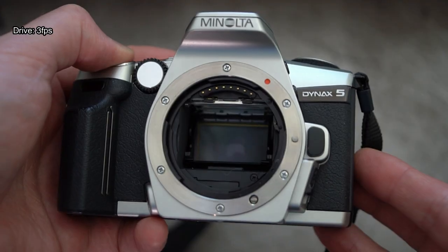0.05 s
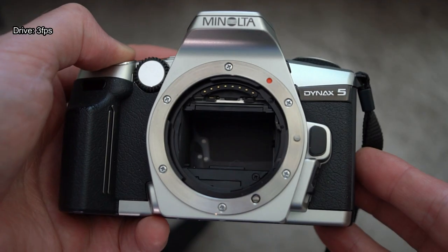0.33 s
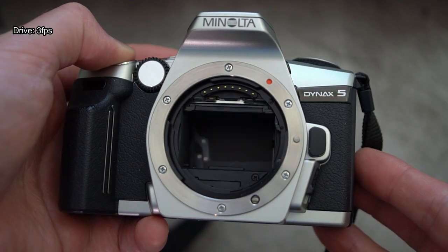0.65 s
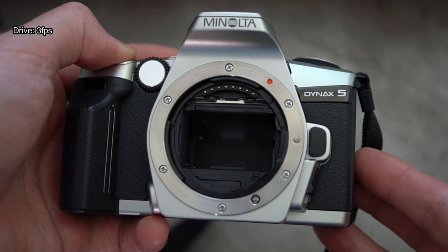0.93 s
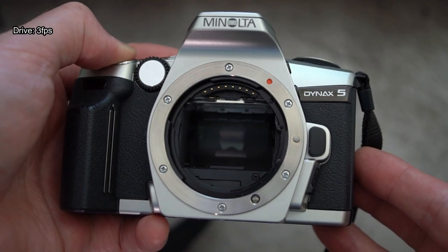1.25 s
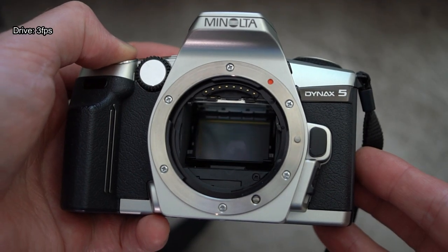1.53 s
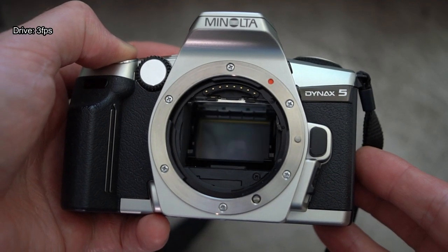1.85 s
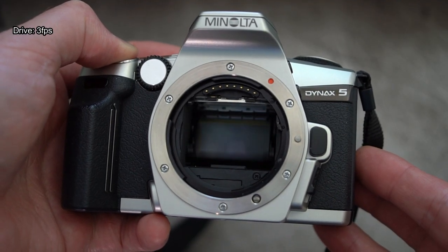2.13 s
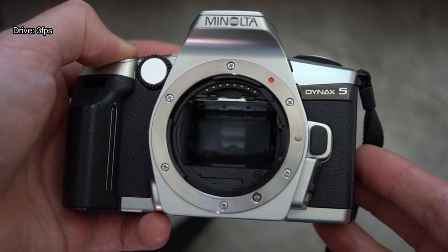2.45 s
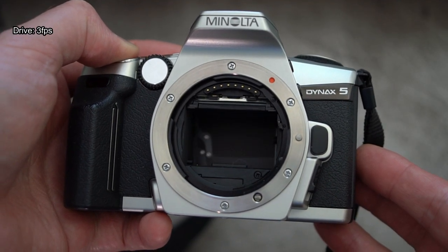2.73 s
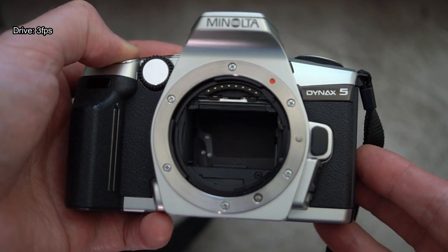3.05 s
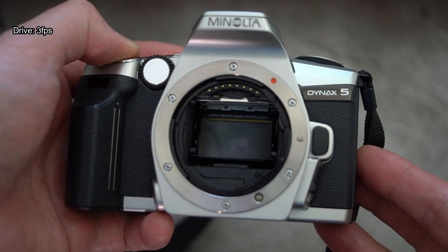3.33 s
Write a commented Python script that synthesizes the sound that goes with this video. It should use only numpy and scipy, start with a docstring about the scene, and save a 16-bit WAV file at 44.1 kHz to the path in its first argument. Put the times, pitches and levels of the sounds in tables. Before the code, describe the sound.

A film camera's shutter fires nine times, close by in a small quiet room. From about 0.2 seconds, shots repeat evenly three times a second, each a crisp mirror click and shutter snap followed by a short gear whine and ratcheting clatter, with faint spring ringing. A soft knock precedes the last shot at 2.9 seconds, and the mechanism locks with a final click at 3.3 seconds.

```python
"""A film camera without a lens fires nine frames, three a second, close by in a small quiet room.
The motor takes up the slack; then in each frame the mirror is released and rises, the shutter snaps,
the winder's gears whine, and the mirror drops back with a clatter of ratchet, cam and pawl.
A soft knock precedes the last frame, and after that frame the mechanism locks. Each impact excites
the resonances of the part it strikes, and the springs and the room ring on briefly."""
import sys
import numpy as np
from scipy import signal
from scipy.fft import rfft, irfft
from scipy.io import wavfile
from scipy.ndimage import uniform_filter1d

SR = 44100
rng = np.random.default_rng(int(sys.argv[2]) if len(sys.argv) > 2 else 0)


def int16_out(signal):
    """Quantize to a 16-bit WAV file."""
    q = np.round(np.clip(np.atleast_2d(signal).T, -1, 1) * 32767)
    wavfile.write(sys.argv[1], SR, q.astype(np.int16))


N = 158760

# mirror release, shutter and mirror return in each frame: start_s
RELEASE_S = [0.2271, .5380, 0.8807, 1.2191, 1.5615, 1.9002, 2.2440, 2.585, 2.9306]
SHUTTER_S = [0.301, 0.6214, 0.959, 1.3007, 1.6389, 1.9819, 2.3216, 2.6671, 3.0139]
RETURN_S = [0.4203, 0.7624, 1.1015, 1.4429, 1.782, 2.1251, 2.4651, 2.8113, 3.1581]
# resonance spectra of the parts that the movements strike: frequency_hz, level_db
CATCH = [(300, -37), (1080, -13), (1330, -10.5), (1550, -5), (3400, -8.5), (4200, -1), (6600, 3), (7200, 0),
         (8000, 1), (11000, -10.5), (14000, 7), (15500, -16.5)]
LEVER = [(300, -41), (950, -16.5), (3680, -5), (7010, -2.5), (7500, -1), (11230, -0.5), (15500, -2.5)]
STOP = [(300, -37), (800, -16.5), (2410, -8), (3770, -12.5), (5890, 3.5), (7740, -0.5), (10420, 0),
        (15500, -8)]
BLADES = [(300, -33.5), (940, -11), (2660, -14.5), (3010, -1), (3330, -16), (6190, 3), (7200, -7),
          (7930, 4), (8550, -5.5), (15500, -7.5)]
LATCH = [(300, -51.5), (1100, -11.5), (2240, -6), (3500, -17.5), (4830, -6), (5350, 2), (7010, -11),
         (8340, 0), (9440, -5), (9920, -1.5), (10680, -10.5), (15500, -8)]
MIRROR = [(300, -34.5), (950, -17), (1150, -0.5), (1330, -7), (1600, -2), (4600, -1.5), (5750, 3.5),
          (7400, -5.5), (13000, -1), (15500, -7)]
TOOTH = [(300, -33.5), (950, -8), (1170, 0), (1400, -7.5), (4200, -5), (5750, 8), (8700, -7), (10170, 7.5),
         (11400, -3.5), (12700, 8), (15500, -7.5)]
TICK = [(300, -48), (5080, -19.5), (7550, -8.5), (9210, -16), (10100, 1.5), (11510, -15), (13690, -4.5),
        (15500, -24.5)]
PAWL = [(300, -47.5), (1060, -13.5), (1700, -4), (2750, 0.5), (3200, -9.5), (3700, -2), (7010, -8.5),
        (8000, -0.5), (10680, -4.5), (12710, 1), (15500, -11)]
HOLLOW = [(700, -41), (1850, -17.5), (2200, -1), (2370, 0.5), (2650, -10.5), (5000, -43)]
BODY = [(150, -30.5), (420, -33.5), (660, -8.5), (980, -1.5), (1200, -4.5), (1900, -8.5), (8000, -21)]
LEAD_S, ATTACK_MS = .008, .25  # time allowed for the scrape before a contact; rise of the contact
WIDTH = .33  # ratio of side to mid amplitude


def amp(db):
    """Amplitude ratio of a level in decibels."""
    return 10 ** (np.asarray(db) / 20)


def unit(x):
    """Normalisation to an energy of 1."""
    return x / np.sqrt(np.sum(x ** 2))


def stereo(mid, side):
    """Sum and difference of mid and side give left and right."""
    return np.array([mid + side, mid - side])


def colour(x, points):
    """Minimum-phase filtering through (frequency_hz, level_db) points, by folding the cepstrum."""
    hz, db = np.array(points, float).T
    size = 2048
    f = np.maximum(np.fft.rfftfreq(size, 1 / SR), 1)
    cepstrum = irfft(np.log(amp(np.interp(np.log(f), np.log(hz), db))))
    cepstrum[1:size // 2] *= 2
    cepstrum[size // 2 + 1:] = 0
    return signal.fftconvolve(x, irfft(np.exp(rfft(cepstrum))))[:len(x)]


def jitter(rate_hz):
    """Low-pass noise with a standard deviation of 1."""
    span = int(SR / rate_hz)
    smooth = uniform_filter1d(uniform_filter1d(rng.standard_normal(N), span), span)
    return smooth / smooth.std()


def impact(noise, part, contact_ms, rattle_db, rattle_ms):
    """Broadband excitation: a scrape, a hard contact and a looser rattle ring a part's resonances."""
    ms = (np.arange(noise.shape[1]) / SR - LEAD_S) * 1000

    def burst(x, decay_ms, lead_in):
        envelope = np.where(ms >= 0, np.exp(-abs(ms) / decay_ms), lead_in)
        for _ in range(2):  # flatten the spectrum so that all frequencies are driven alike
            spectrum = rfft(x * envelope)
            x = irfft(spectrum / (abs(spectrum) + 1e-12))
        return unit(colour(x * np.sqrt(envelope), part))

    scrape = amp(-8) * np.exp(-abs(ms) / 4.4)
    contact = burst(noise[0], 2 * contact_ms, np.exp(-abs(ms) / ATTACK_MS))
    rattle = burst(noise[1], 2 * rattle_ms, scrape)
    return contact + amp(rattle_db) * rattle


def movement(times, blows, first_db=0):
    """Superposition of impacts, varied a little each time; first_db softens the start from rest."""
    out = np.zeros((2, N))
    for delay_s, part, level_db, *shape in blows:
        common = rng.standard_normal((2, 2, 2048))
        width = WIDTH / 4 if part is BODY else WIDTH
        for frame, start_s in enumerate(times):
            excitation = common + .8 * rng.standard_normal(common.shape)
            mid, side = (impact(noise, part, *shape) for noise in excitation)
            db = level_db + .5 * rng.standard_normal() + first_db * (frame == 0)
            gain = amp(db) * np.sqrt(SR / 1000)  # level as if the energy fell within 1 ms
            i = max(int((start_s + delay_s - LEAD_S - ATTACK_MS / 1000) * SR), 0)
            out[:, i:i + len(mid)] += gain * stereo(mid, side * width)[:, :N - i]
    return out


def hiss():
    """Noise floor: faint, steady and nearly white."""
    # noise spectrum: frequency_hz, level_db
    spectrum = [(30, 1), (1500, 1), (16000, -3)]
    mid, side = (unit(colour(rng.standard_normal(N), spectrum)) for _ in range(2))
    return amp(-96) * np.sqrt(N) * stereo(mid, WIDTH * side)


def room(x):
    """Reverberation: a diffuse field builds up and decays exponentially, the treble first."""
    # reverberant bands: frequency_hz, level_db, t60_s
    bands = [(690, -9.5, 0.44), (2500, -8.5, 0.31), (6400, -14, 0.27), (15900, -10, 0.069)]
    t, f = np.arange(SR // 2) / SR, np.fft.rfftfreq(SR // 2, 1 / SR)
    centres_hz = np.array(bands)[:, 0]
    build_up = 1 - np.exp(-t / .0061)
    wet = []
    for noise in rng.standard_normal((2, len(t))):
        tail = 0
        for share, (_, db, t60_s) in zip(np.eye(len(bands)), bands):
            band = irfft(rfft(noise) * np.interp(f, centres_hz, share))
            tail += amp(db) * band * unit(build_up * np.exp(-np.log(1000) * t / t60_s))
        wet.append(signal.fftconvolve(x, tail)[:N])
    return stereo(*wet)


def springs(x):
    """Sympathetic vibration: springs inside the camera ring on after the blows."""
    # spring modes: pitch_hz, level_db, t60_s
    modes = [(1158, -27, .34), (770, -35, .3)]
    t = np.arange(SR // 2) / SR
    ring = sum(amp(db) * unit(np.sin(2 * np.pi * hz * t) * np.exp(-np.log(1000) * t / t60_s))
               for hz, db, t60_s in modes)
    return signal.fftconvolve(x, ring)[:N]


def knock(start_s=2.891, pitch_hz=470, rise_s=.0033, decay_s=.0037):
    """Heavily damped oscillation: a single mode gives one soft, hollow knock."""
    age = np.maximum(np.arange(N) / SR - start_s, 0)
    envelope = (1 - np.exp(-age / rise_s)) * np.exp(-age / decay_s)
    return amp(-44.5) * envelope * np.sin(2 * np.pi * pitch_hz * age)


def winder(teeth=10, flutter=.018, eccentricity=.3):
    """Gear meshing: teeth whine and grind; the motor slows as it cocks the springs, then picks up."""
    # mesh tone through one winding: time_s, pitch_hz, level_db
    whine_curve = [(0, 2600, -64), (.064, 3190, -56), (.09, 2990, -49), (.114, 2740, -52),
                   (.175, 2630, -55), (.2, 2950, -54), (.215, 3100, -48), (.228, 3020, -51),
                   (.25, 2700, -75)]
    # gear noise through one winding: time_s, level_db
    grind_curve = [(0, -51), (.112, -52.5), (.123, -41), (.168, -48.5), (.228, -50.5), (.241, -63.5),
                   (.268, -53), (.335, -61.5)]
    # mesh harmonics, from the fundamental up: level_db
    harmonics = [-11, -5, 0, -7]
    # spectrum of the gear noise: frequency_hz, level_db
    gear_spectrum = [(120, -76.5), (200, -33), (432, -34.5), (806, -10.5), (1870, -0.5), (4860, -5),
                     (6170, -2.5), (7540, -6), (8900, -6.5), (10300, -7), (12600, -7.5), (16000, -10.5)]
    whine_s, mesh_hz, whine_db = np.array(whine_curve).T
    grind_s, grind_db = np.array(grind_curve).T
    t = np.arange(N) / SR
    hz, whine, grind = np.full(N, mesh_hz[0]), np.zeros(N), np.zeros(N)
    for shutter_s, return_s in zip(SHUTTER_S, RETURN_S):
        age = t - return_s + .1435  # the curves begin this long before the mirror returns
        running = (t > shutter_s) & (age < grind_s[-1])
        hz[running] = np.interp(age[running], whine_s, mesh_hz)
        whine[running] = amp(np.interp(age[running], whine_s, whine_db))
        grind[running] = amp(np.interp(age[running], grind_s, grind_db))
    grind += amp(-53) * np.interp(t, [.2063, RELEASE_S[0], SHUTTER_S[0]], [0, 1, 0])  # taking up slack
    phase = 2 * np.pi * np.cumsum(hz * (1 + flutter * jitter(584))) / SR
    rotation = np.sin(phase / teeth)
    wobble = 1 + eccentricity * (rotation + jitter(900))
    tone = whine * wobble * sum(amp(db) * np.sin(k * phase) for k, db in enumerate(harmonics, 1))
    roughness = amp(1.7 * (jitter(600) + rotation))
    mid, side = (unit(colour(roughness * rng.standard_normal(N), gear_spectrum)) for _ in range(2))
    return tone + grind * np.sqrt(N) * stereo(mid, WIDTH * side)


def final_lock():
    """Impact excitation: lever, stop and tooth lock the mechanism after the last frame."""
    # impacts: delay_s, part, level_db, contact_ms, rattle_db, rattle_ms
    blows = [(-.0205, LEVER, -43, 0.7, 4, 5), (0, STOP, -28.5, 0.81, -7.5, 1.3),
             (.001, TOOTH, -36.5, 0.98, 1.5, 1.5), (.0016, BODY, -42.5, .5, -6, 3.5)]
    return movement([3.3131], blows)


def latch_click():
    """Structure-borne sound: from the second frame on, a latch clicks and the body resounds."""
    # clicks, each just after the shutter: start_s
    times = [0.6654, 1.0046, 1.3467, 1.6856, 2.0277, 2.3676, 2.7133, 3.0595]
    # impacts: delay_s, part, level_db, contact_ms, rattle_db, rattle_ms
    blows = [(0, LATCH, -29, 0.41, -1.2, 1.6), (.0016, BODY, -43, 0.61, -2.2, 3.1)]
    return movement(times, blows)


def mirror_rise():
    """Impact excitation: a catch lets go, and levers swing the mirror up against its stop."""
    # impacts: delay_s, part, level_db, contact_ms, rattle_db, rattle_ms
    blows = [(0, CATCH, -28.5, 0.72, -4.5, 3), (.002, BODY, -46.5, .8, -2, 5),
             (0.0108, LEVER, -29.5, .5, 2.5, 2.8), (.0222, LEVER, -37.5, .4, 3.5, 1.8),
             (.028, STOP, -27.5, .35, -8, 3), (.0285, BODY, -54.5, 1, 7, 3.2)]
    return movement(RELEASE_S, blows, first_db=-6)


def mirror_return():
    """An impact train: the mirror drops, the ratchet ticks, and cam and pawl click as the film stops."""
    # impacts: delay_s, part, level_db, contact_ms, rattle_db, rattle_ms
    blows = [(-.0215, MIRROR, -33.5, 1.6, 7, 4.3), (-.018, PAWL, -38.5, 1, 2, 3.9),
             (0, TOOTH, -29.5, 1.4, 3, 3.8), (0.0112, TOOTH, -34, 0.87, 6, 4.9),
             (.02, TOOTH, -34.5, 0.56, 3, 4.4), (.0315, PAWL, -34, 0.52, 4.5, 3.7),
             (.0312, HOLLOW, -33.5, .69, -6.5, 2.5), (.063, TICK, -30, .35, -21, 1.4),
             (0.0865, PAWL, -31, 1.3, 2, 2.5), (.088, HOLLOW, -35, 0.32, -19, 2.5)]
    return movement(RETURN_S, blows, first_db=-1)


def shutter():
    """Temporal fusion: blows on lever, blades and body, milliseconds apart, are heard as one snap."""
    # impacts: delay_s, part, level_db, contact_ms, rattle_db, rattle_ms
    blows = [(-.0022, LEVER, -44, .6, 0, 1.4), (0, LEVER, -30.5, .4, -2, 1.5),
             (.0022, BLADES, -36.5, 0.3, 1, 2.2), (.0037, BLADES, -32.5, .7, 1, 2.4),
             (.005, BODY, -43.5, 1.2, -1.1, 2.4)]
    return movement(SHUTTER_S, blows, first_db=-3)


def scene():
    """Superposition of the direct sound, the ringing and reverberation it drives, and the hiss."""
    camera = mirror_rise() + shutter() + latch_click() + mirror_return() + final_lock()
    camera += winder() + knock()
    mono = camera.mean(axis=0)
    return camera + hiss() + springs(mono) + room(mono)


def record(dry):
    """Level difference: two close microphones hear the lows alike and the treble louder on the left."""
    # response of the side signal: frequency_hz, gain_db
    side_response = [(200, -8), (700, -11), (1500, -8.5), (4500, -.5)]
    # boost on the left and equal cut on the right: frequency_hz, gain_db
    lift = np.array([(2500, .017), (5000, .97), (14000, .26)])
    mid, side = (dry[0] + dry[1]) / 2, (dry[0] - dry[1]) / 2
    left, right = stereo(mid, colour(side, side_response))
    pair = np.array([colour(left, lift), colour(right, lift * [1, -1])])
    low_pass = signal.ellip(10, .2, 70, 16100, fs=SR, output="sos")
    return signal.sosfilt(low_pass, pair)


dry = scene()
out = record(dry)
int16_out(out)
```